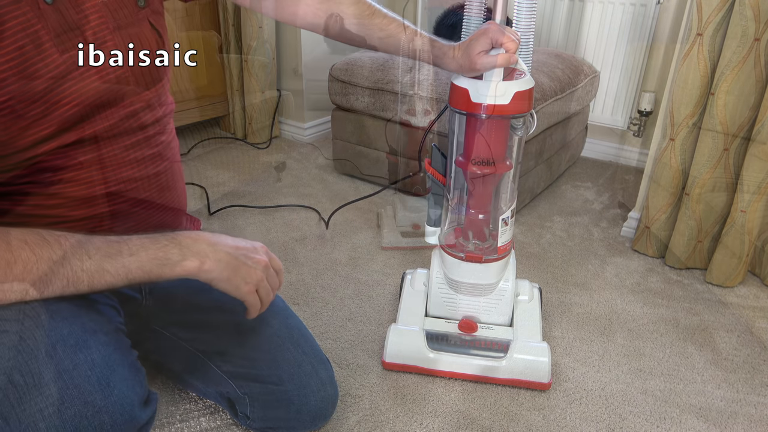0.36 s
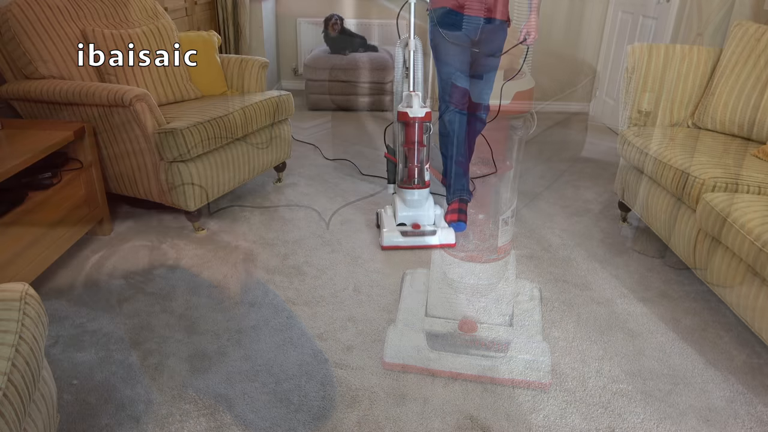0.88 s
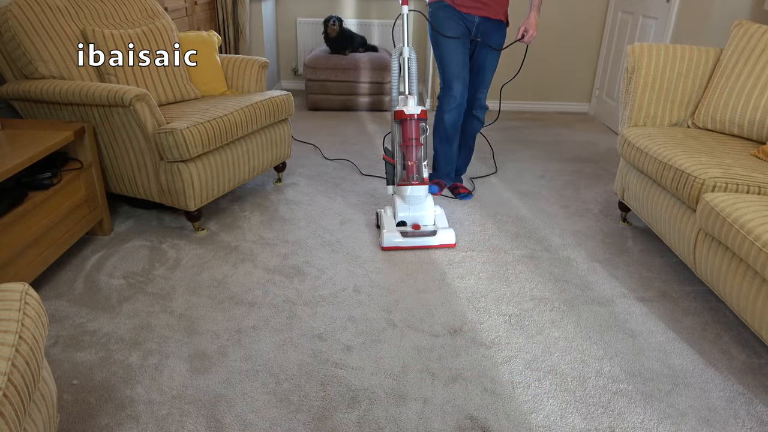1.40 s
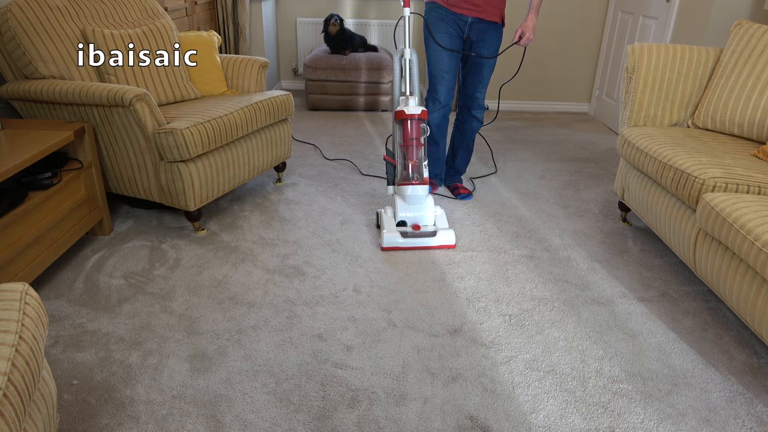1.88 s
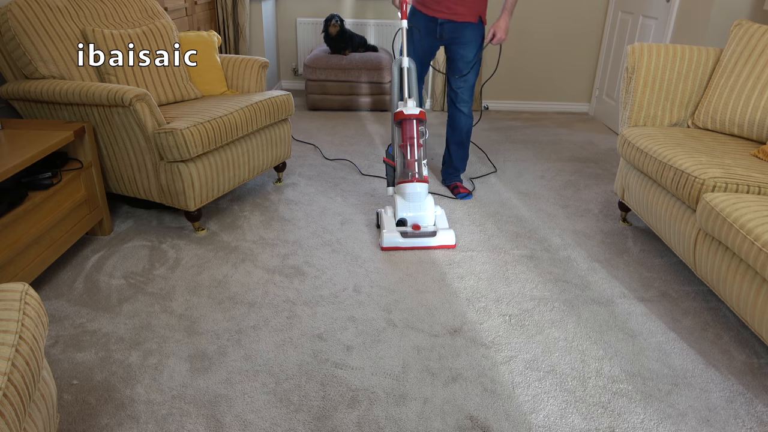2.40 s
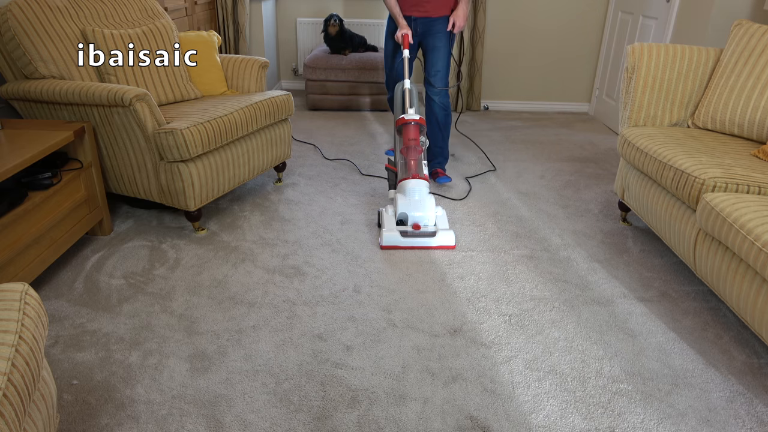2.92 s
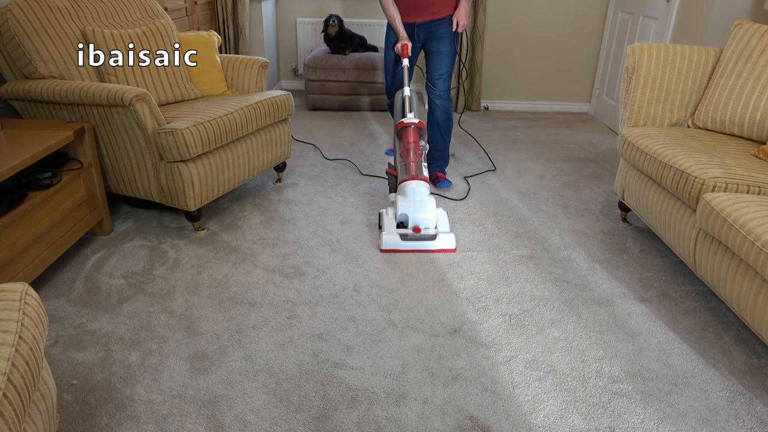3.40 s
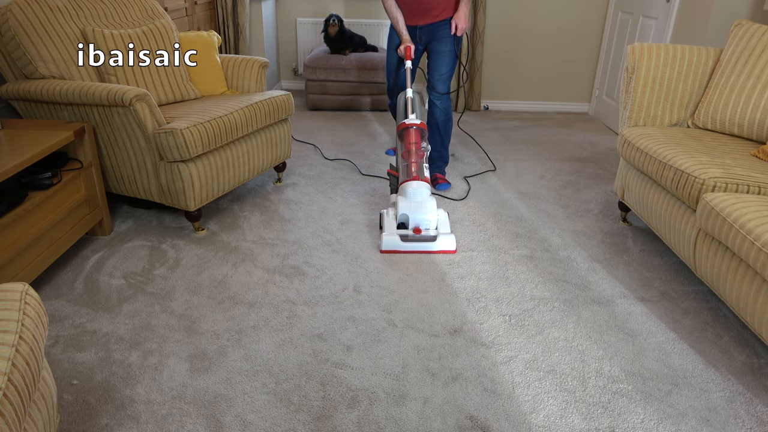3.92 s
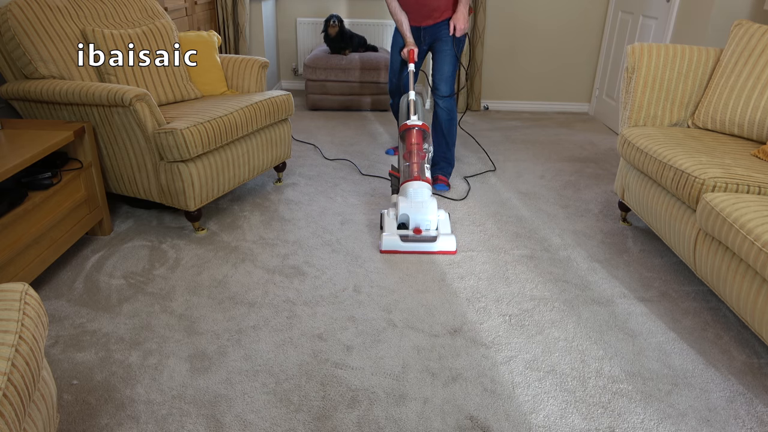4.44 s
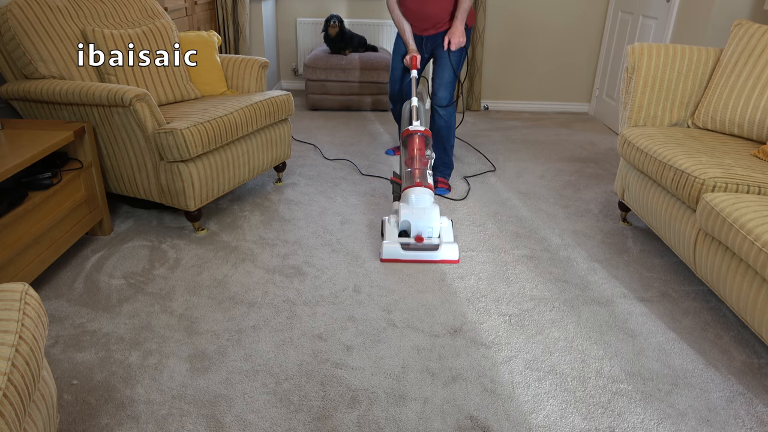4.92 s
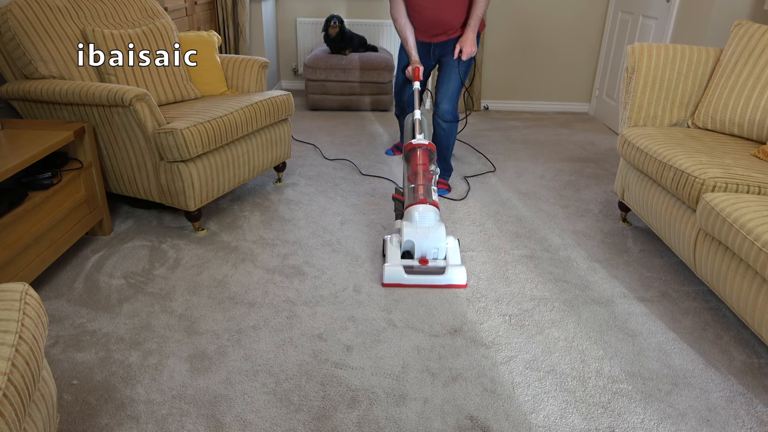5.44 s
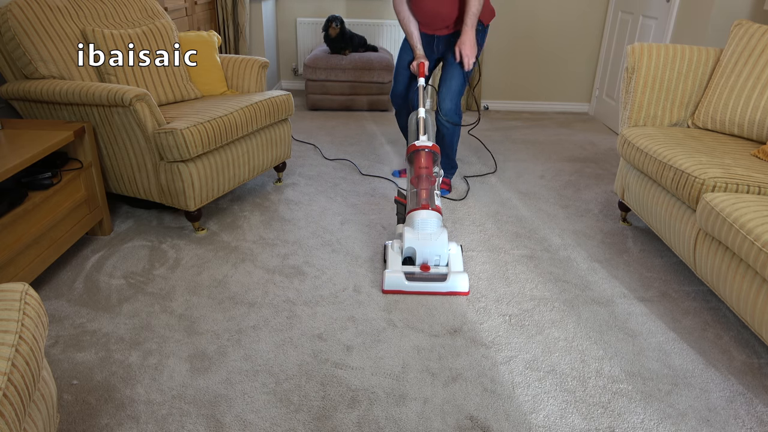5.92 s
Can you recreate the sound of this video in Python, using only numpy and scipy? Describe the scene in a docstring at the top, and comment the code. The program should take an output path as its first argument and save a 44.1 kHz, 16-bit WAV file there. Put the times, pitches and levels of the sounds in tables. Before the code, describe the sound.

A quiet living room with low hum and the fading end of a knock. Light plastic ticks lead to a loud, sharp latch clack just before one second, then faint shuffling and a switch click. The vacuum motor jolts on, whines up quickly and settles into a close, loud roar with fast brush drumming and hiss. The brush then bites the carpet, lowering its pitch and rasping more.

```python
"""An upright vacuum cleaner on living-room carpet: its belt-driven brush roll drums a stack of partials once
a turn, and slows as the handle is lowered and the bristles bite. Fan blades whine as a tone that tracks motor
speed, air roars and hisses as filtered noise, the motor buzzes. Before that come handling ticks (noise bursts),
a plastic latch and a foot switch (uneven noise slips). Mains hum, rumble and room hush lie below."""
import sys
import numpy as np
from scipy import signal
from scipy.fft import rfft, irfft
from scipy.io import wavfile
from scipy.ndimage import uniform_filter1d

SR = 44100
rng = np.random.default_rng(int(sys.argv[2]) if len(sys.argv) > 2 else 0)


def pcm_store(signal):
    """Save signal as 16-bit PCM."""
    levels = np.round(np.clip(np.atleast_2d(signal), -1, 1) * 32767)
    wavfile.write(sys.argv[1], SR, levels.astype(np.int16).T)


def invert_db(x):
    """Field ratio 10**(x/20) for x, a level in decibels (scalar or array-like)."""
    u = np.asarray(x, float) / 20
    return 10 ** u


N = 267510
SWITCH_S = 1.622

# stance of the machine: t/s, stance index (0 running up, 1 parked upright, 2 tipped back,
# 3 pressed into the pile, 4 starting to roll, 5 pushed along, 6 slowed)
STANCE_TRACK = [(2.0, 0), (2.35, 1), (3.12, 1), (3.35, 2), (3.7, 3), (4.25, 3), (4.6, 4), (4.8, 4),
                (5.1, 5), (5.5, 5), (5.8, 6)]
# carpet drag: t/s, roll slowdown/(turns/s), blade tone sag/Hz
CARPET_DRAG = [(3.13, 0, 0), (3.22, 1.3, 5), (3.33, 3.8, 24), (3.46, 5.8, 52), (3.7, 7.1, 93),
               (3.9, 7.6, 106), (4.24, 7.4, 112), (4.41, 6.1, 104), (4.52, 4.1, 94), (4.6, 3.7, 87),
               (4.67, 3.9, 80), (4.81, 5.3, 75), (4.99, 3.0, 67), (5.19, 1.7, 52), (5.48, 1.3, 38),
               (5.7, 2.9, 43), (5.85, 2.5, 50), (6.07, 1.6, 38)]
# working effort: t/s, machine level/dB, bristle bite/dB
EFFORT_TRACK = [(1.62, -8, -17), (1.75, -2.2, -5), (2.1, 0.4, -5), (2.5, -0.05, -18), (2.7, -0.3, -10),
                (3.15, -0.5, -3.5), (3.28, 0.1, -4), (3.47, -1.7, 5.5), (3.5, -0.5, 5), (3.8, -4, 12),
                (4.28, -6, 9), (4.36, -3, 5), (4.42, -4, -0.5), (4.63, -3, 0.5), (4.67, -2.5, 4.5),
                (5.26, -2.5, 1.5), (5.6, -4, 2), (6.07, -9.5, 8.5)]
# resonances of the plastic shell: f/Hz, relative density/dB
SHELL_COLOUR = [(35, -53), (60, -20), (169, -1), (319, -11), (659, -3.5), (735, -2), (881, -7), (1000, -4),
                (1140, -14), (1240, -5), (1470, -13.5), (1890, -6.5), (3260, -23), (3840, -10.5),
                (4600, -29), (5980, -51), (10100, -120)]


def curve(rows, before=-120.):
    """Table columns interpolated along time; `before` holds ahead of the first row."""
    s, *cols = np.transpose(rows)
    return [np.interp(np.arange(N) / SR, s, c, left=before) for c in cols]


def colour(x, points, lo_hz=20., hi_hz=20000.):
    """Filter by (f/Hz, level/dB) points on a log frequency axis; rms 1 between lo_hz and hi_hz."""
    hz, db = np.transpose(points)
    f = np.fft.rfftfreq(N, 1 / SR) + 1e-3
    spec = rfft(x) * invert_db(np.interp(np.log(f), np.log(hz), db))
    part = irfft(spec * ((f > lo_hz) & (f < hi_hz)), N)
    return irfft(spec, N) / np.std(part)


def walk(rate_hz):
    """Random levels held 1 / rate_hz and slewed twice; spread near 1."""
    k = int(SR / rate_hz)
    steps = np.repeat(rng.standard_normal(N // k + 1), k)
    return 1.28 * uniform_filter1d(uniform_filter1d(steps, k), k)[:N]


def ring(modes, secs, spread_hz=70.0, count=5):
    """Decaying modes, each a cluster of close partials that beat; low ones cluster tighter."""
    t = np.arange(int(secs * SR)) / SR
    out = np.zeros(len(t))
    for hz, db, t60_s in modes:
        for _ in range(count):
            near_hz = hz + min(spread_hz, hz / 20) * rng.standard_normal()
            phase = rng.standard_normal()
            out += invert_db(db - 60 * t / t60_s) * np.cos(2 * np.pi * near_hz * t + phase)
    return out


def hush():
    """Steady room hush: coloured noise."""
    # f/Hz, relative density/dB
    hush_colour = [(41, -46), (70, -23), (108, 2.5), (123, -20), (154, -9), (177, -11.5), (305, -12.5),
                   (418, -18), (490, -22), (524, -24.5), (2920, -40), (5150, -40.5), (15600, -36)]
    return colour(rng.standard_normal(N), hush_colour, 200, 20000) * invert_db(-53.5)


def hum():
    """Mains hum: a fundamental that wavers along with a low rumble, plus steady overtones."""
    # t/s, common level of fundamental and rumble/dB
    hum_track = [(0.0, -38), (0.24, -41), (0.466, -34.5), (0.934, -29), (1.122, -31), (1.18, -37),
                 (1.318, -33), (1.38, -35.5), (1.6, -33), (1.8, -32), (2.6, -38), (6.07, -48)]
    # f/Hz, level/dB; the first row is the fundamental, whose level comes from hum_track instead
    mains = [(48.4, -39), (96.9, -63), (150.7, -50.5), (253.0, -66), (306.8, -65)]
    t = np.arange(N) / SR
    level_db = curve(hum_track, hum_track[0][1])[0] + 2.5 * walk(9.76)
    low, *upper = (np.sqrt(2) * np.sin(2 * np.pi * (hz * t + rng.random())) for hz, _ in mains)
    overtones = sum(invert_db(db) * tone for (_, db), tone in zip(mains[1:], upper))
    rumble_colour = [(12, -37), (25, -8), (42, -17), (60, -9), (100, -33), (300, -83)]
    rumble = colour(rng.standard_normal(N), rumble_colour)
    return invert_db(level_db) * (0.82 * low + 0.44 * rumble) + overtones


def earlier_knock():
    """End of a knock just before the start: ringing modes over a decaying noise tail."""
    # f/Hz (cluster centre), level/dB of each partial, t60/s
    knock_modes = [(74.7, -35.5, 0.32), (292, -60, .2), (1545, -44.5, 0.36), (1810, -45, 0.2),
                   (2900, -56, 0.24), (3700, -48, 0.28), (4670, -59, 0.19)]
    t = np.arange(N) / SR
    tail = invert_db(-41.0 - 60 * t / 0.42) * colour(rng.standard_normal(N), SHELL_COLOUR)
    return tail + np.pad(ring(knock_modes, .5), (0, N))[:N]


def room(x):
    """Carpet and cushions: a short tail, the treble dying first."""
    t60_s, tail_db = .38, -9
    t = np.arange(int(.6 * SR)) / SR
    noise = rng.standard_normal(len(t)) * (t > .004)
    low = signal.lfilter([.25], [1, -.75], noise)
    high = noise - low
    tail = low * invert_db(-60 * t / t60_s) + .6 * high * invert_db(-60 * t / (.85 * t60_s))
    return x + invert_db(tail_db) * signal.fftconvolve(x, tail / np.linalg.norm(tail))[:N]


def ticks():
    """Contacts on the plastic: each a short band-passed noise knock with a bright edge."""
    # t/s, relative level/dB, centre f/Hz, t60/s, bright edge against knock/dB
    contacts = [(.557, -43, 2000, .03, -20), (.604, -45, 2000, .03, -22), (.717, -26, 606, 0.039, -23),
                (.767, -27.5, 493, 0.053, -16), (.778, -31, 2200, 0.027, -6), (0.83, -23, 2120, 0.017, -5),
                (.953, -16, 3800, .01, 7), (0.96, 3, 1530, 0.018, -2.5), (1.317, -44, 5000, .01, -6),
                (1.401, -33, 1560, 0.12, -22), (1.417, -42, 3700, .03, -8), (1.549, -27.5, 690, .07, -15),
                (1.581, -25, 1020, 0.031, -25), (1.623, -20, 700, .03, -3), (1.645, -24, 3000, .03, 3)]
    out, t = np.zeros(N), np.arange(int(.15 * SR)) / SR
    bright = signal.butter(1, [3000., 9000.], "bandpass", fs=SR, output="sos")
    for s, db, hz, t60_s, edge_db in contacts:
        band = signal.butter(2, [hz / 1.25, hz * 1.22], "bandpass", fs=SR, output="sos")
        noise = rng.standard_normal(len(t))
        attack = 1 - np.exp(-t / 0.0005)
        knock = signal.sosfilt(band, noise * attack * invert_db(-60 * t / t60_s))
        edge = signal.sosfilt(bright, noise * invert_db(-60 * t / .005))
        both = knock / np.abs(knock).max() + invert_db(edge_db) * edge / np.abs(edge).max()
        i = int(s * SR)
        out[i:i + len(t)] += invert_db(db - 2.0) * both
    return out


def slide(rows, scatter_db=2.0):
    """Dense uneven slips of plastic on plastic: the shell's resonances and a bright scrape."""
    slips = rng.standard_normal((2, N)) * invert_db(scatter_db * walk(400))
    shell_db, scrape_db = curve(rows)
    shell = colour(slips[0], SHELL_COLOUR, 500, 4600)
    scrape = colour(slips[1], [(3000, -34), (4600, 2.0), (8000, 1), (11000, -6), (15700, -25)])
    sliding = np.arange(N) < rows[-1][0] * SR
    return (shell * invert_db(shell_db) + scrape * invert_db(scrape_db)) * sliding


def latch():
    """The handle latch slides, lets go and rattles."""
    # t/s, shell level/dB, scrape level/dB
    latch_track = [(.45, -72, -80), (.56, -57, -76), (.71, -53.5, -72), (.83, -41, -56), (.9, -45, -58),
                   (.947, -32.5, -43), (.959, -12, -20), (.969, -22, -41), (1.015, -17.5, -37.5),
                   (1.07, -34.5, -48)]
    return slide(latch_track)


def foot_switch():
    """A foot shuffles onto the switch and presses it down."""
    # t/s, shell level/dB, scrape level/dB
    press_track = [(1.12, -62, -62), (1.3, -57, -60.5), (1.575, -58, -64), (1.585, -41, -63),
                   (1.622, -47, -57)]
    return slide(press_track)


def speed(lead_s=.035):
    """Share of full speed: a quick and a slow exponential run-up, starting lead_s before the switch."""
    quick_share, quick_s, slow_s = .49, .085, .256
    on_s = np.maximum(np.arange(N) / SR - SWITCH_S + lead_s, 0)
    return 1 - quick_share * np.exp(-on_s / quick_s) - (1 - quick_share) * np.exp(-on_s / slow_s)


def roll_angle():
    """Brush roll angle/rad: integrated turn rate, slowed by carpet drag."""
    free_turns_per_s = 71.45
    return 2 * np.pi * np.cumsum(free_turns_per_s * speed() - curve(CARPET_DRAG, 0)[0]) / SR


def stance_db(column):
    """One column of the stance balance along time, offset by the machine's level."""
    # one row a stance: low drumming/dB, bristle slap/dB, top hiss/dB
    balance = [(-20, -27, -35), (-21.5, -26, -34), (-20, -20.5, -37), (-20.5, -19, -34.5),
               (-19.5, -19, -37), (-19.5, -22.5, -38), (-18, -21.5, -35.5)]
    levels = np.transpose(balance)[column]
    return np.interp(curve(STANCE_TRACK, 0)[0], np.arange(len(balance)), levels) + curve(EFFORT_TRACK)[0]


def jolt():
    """Loose panels and wheels shake in lumps of noise as the motor kicks in, then die away."""
    # f/Hz, relative density/dB
    jolt_colour = [(29, -43), (50, -12), (92, -14), (172, -10), (205, -10.5), (361, -5), (912, -20),
                   (1180, -27), (1500, -24), (1950, -51), (3300, -120)]
    level_db, rise_s, hold_s, fall_db_per_s = -16, 0.034, 0.21, 130
    on_s = np.arange(N) / SR - SWITCH_S
    lumps = rng.standard_normal(N) * invert_db(2.8 * walk(150))
    fall_db = fall_db_per_s * np.maximum(on_s - hold_s, 0)
    return colour(lumps, jolt_colour, 120, 1000) * invert_db(level_db - fall_db) * np.clip(on_s / rise_s, 0, 1)


def buzz():
    """The magnetic pull peaks twice a mains cycle, strongest at the inrush and under load."""
    base_db, inrush_db, inrush_s, db_per_slip, waver_db = -31, 17.5, 0.23, .5, 1.5
    t = np.arange(N) / SR
    surge_db = inrush_db * np.exp(-np.maximum(t - SWITCH_S, 0) / inrush_s)
    load_db = db_per_slip * curve(CARPET_DRAG, 0)[0]
    level_db = base_db + surge_db + load_db + waver_db * walk(3.99)
    return np.sqrt(2) * invert_db(level_db) * np.sin(2 * np.pi * 99.9 * t)


def air(turn):
    """Turbulent roar and hiss as noise; two bristle rows rasp over the pile twice a turn."""
    # each: f/Hz, relative density/dB
    roar_colour = [(18, -34), (30, -14), (80, -9.5), (193, -12), (257, -7), (304, -16.5), (445, -2.5),
                   (565, -14.5), (684, -4.5), (1160, -16.5), (2200, -13.5), (3070, -19), (3550, -14.5),
                   (5200, -31.5), (9000, -31.5), (11700, -51), (19800, -120)]
    hiss_colour = [(2650, -17), (4500, -1), (5340, -4), (6820, -4.5), (7530, -2.5), (9420, -6.5),
                   (12300, -5.5), (14300, -10.5), (15600, -14.5)]
    rasp_colour = [(3530, -5), (6000, -5), (6920, -8.5), (7500, 1), (9080, 3), (10800, 2.5), (11500, -4.5),
                   (13000, -13)]
    roar_db, rasp_db, hiss_db_per_bite_db, hiss_db_per_decade = -23, -29, 0.15, 31
    level_db, bite_db = curve(EFFORT_TRACK)

    roar_noise = rng.standard_normal(N) * (1 + 0.033 * np.cos(turn))
    roar = colour(roar_noise, roar_colour, 880, 4950) * invert_db(level_db + roar_db + 2.16 * walk(12))

    speed_db = hiss_db_per_decade * np.log10(np.maximum(speed(), .4))
    hiss_db = stance_db(2) + hiss_db_per_bite_db * bite_db + speed_db
    hiss = colour(rng.standard_normal(N), hiss_colour, 11660, 15800) * invert_db(hiss_db + 0.67 * walk(15))

    gate = (1 + 0.34 * np.cos(turn)) * invert_db(6.2 * np.cos(2 * turn))
    rasp = colour(rng.standard_normal(N) * gate, rasp_colour) * invert_db(level_db + bite_db + rasp_db)
    return roar + hiss + rasp


def fan():
    """Blade tone with faint sidebands one shaft turn away; it swells and fades in the room's standing waves."""
    # multiple of the shaft rate, level against the whine/dB
    shaft_partials = [(11, -17), (12, 0), (13, -19)]
    # swells of the whine: start t/s, length/s, level/dB
    swells = [(1.753, 0.018, -21), (1.903, .04, -30.5), (2.043, 0.14, -24), (2.243, 0.062, -22.5),
              (2.44, .02, -25), (2.54, 0.23, -25.5), (2.99, .23, -28), (3.35, 0.055, -23.5),
              (3.53, 0.061, -27), (3.64, .04, -30), (3.772, 0.62, -23), (4.55, 0.017, -28),
              (4.655, 0.2, -25), (4.95, 0.08, -27), (5.22, .055, -29.5), (5.35, .04, -33),
              (5.497, .12, -31.5)]
    blades, free_blade_hz = 12, 4060
    floor_db, fade_db_per_s = -40, 200
    ripple_hz, ripple_step_hz, ripple_db, ripple_until_share = 3680, 48.2, 4, .03

    t, share = np.arange(N) / SR, speed(lead_s=0.)
    hz = free_blade_hz * share - curve(CARPET_DRAG, 0)[1]
    shaft = 2 * np.pi * np.cumsum(hz * (1 + 0.00027 * walk(40.0))) / SR / blades

    level_db = np.full(N, float(floor_db))
    for s, secs, db in swells:
        outside_s = np.maximum(np.abs(t - s - secs / 2) - secs / 2, 0)
        level_db = np.maximum(level_db, db - fade_db_per_s * outside_s)

    # standing waves crossed during run-up; the ripple ends ripple_until_share below full speed
    depth = np.clip((1 - share) / ripple_until_share - 1, 0, 1)
    ripple = depth * np.cos(2 * np.pi * (hz - ripple_hz) / ripple_step_hz)
    waver_db = 1.2 * walk(14)
    tone = sum(invert_db(db) * np.sin(n * shaft) for n, db in shaft_partials)
    return np.sqrt(2) * invert_db(level_db + ripple_db * ripple + waver_db) * tone


def brush_roll(turn, count=62):
    """The same bumps come round every turn; high partials line up into one sharp slap of the bristles."""
    # each: multiple of the turn rate, relative level/dB
    run_up = [(1, 1), (2, -12), (3, -2), (4, 6.5), (5, -2.5), (6, -7), (7, 1.5), (8, -6), (9, -10),
              (10, -2), (11, -47), (12, -8), (13, -27), (14, -3.5)]
    parked = [(1, 4.5), (2, -3.5), (3, -7.5), (4, -11), (5, 1.5), (6, 1.5), (7, 3), (8, -3.5), (9, -0.5),
              (10, -7), (11, -3.5), (12, -13), (13, -41), (14, -1.5), (15, -5.5), (16, -12), (17, -32),
              (18, -9.5), (19, -8), (20, -17), (21, -27), (22, -38), (23, -66), (24, -15), (25, -31),
              (26, -30), (27, -20), (28, -20), (29, -38), (30, -19), (31, -15), (32, -15), (33, -5.5),
              (34, -32), (35, -18), (36, -6.5)]
    tipped = [(1, 0), (2, -5.5), (3, -12), (4, 3), (5, -1), (6, -4), (7, -8), (8, -34), (9, -3.5), (10, -1),
              (11, -9), (12, -2), (13, -16), (14, -15), (15, -5), (16, -9), (17, -9), (18, -19), (19, -10),
              (20, -14), (21, -21), (22, -4), (23, -24), (24, -27), (25, -3.5), (26, -26), (27, -19),
              (28, -13), (29, -18), (30, -4), (31, -16), (32, -6), (33, -3), (34, -7), (35, -24),
              (36, -4.5), (37, -27), (38, -20), (39, -28), (40, -25)]
    pressed = [(1, 3), (2, -10), (3, -3.5), (4, -1), (5, -7.5), (6, -3.5), (7, -0.5), (8, -5), (9, -13),
               (10, -4.5), (11, -2.5), (12, -12), (13, -8.5), (14, -23), (15, -3.5), (16, -30), (17, -4.5),
               (18, -28), (19, -27), (20, -9), (21, -8), (22, -30), (23, -50), (24, -32), (25, -11),
               (26, -3), (27, -14), (28, -24), (29, -26), (30, -3.5), (31, -17), (32, -27.5), (33, -24),
               (34, -7), (35, -29), (36, -5.5), (37, -30), (38, -26), (39, -7.5), (40, -24), (41, -8),
               (42, -25), (43, -29), (44, -7.5), (45, -54), (46, -28), (47, -14), (48, -38), (49, -25),
               (50, -27), (51, -27), (52, -11), (53, -23), (54, -14), (55, -15), (56, -13)]
    rolling = [(1, -4), (2, -17), (3, -11.5), (4, -3.5), (5, -4), (6, 2), (7, -7.5), (8, -2), (9, -11),
               (10, -5), (11, -12), (12, -8), (13, -2.5), (14, -21), (15, -5), (16, -27), (17, -12),
               (18, -32), (19, -10), (20, -8), (21, -24), (22, -19), (23, -13), (24, -13), (25, -18),
               (26, -26), (27, -8.5), (28, -12), (29, -18), (30, -19), (31, -8), (32, -18), (33, -9),
               (34, -23), (35, -32), (36, -10), (37, -26), (38, -13), (39, -20), (40, -8), (41, -21),
               (42, -24), (43, -26), (44, -11.5), (45, -26), (46, -29)]
    pushed = [(1, 1.5), (2, -8.5), (3, -25), (4, -6.5), (5, -0.5), (6, 0.5), (7, 1), (8, -3.5), (9, -8.5),
              (10, -1), (11, -18), (12, -0.5), (13, -12), (14, -29), (15, -19), (16, -26), (17, -6),
              (18, -20), (19, -12), (20, -6.5), (21, -13), (22, -13), (23, -19), (24, -6.5), (25, -30),
              (26, -21), (27, -8.5), (28, -18), (29, -10), (30, -5), (31, -11), (32, -8), (33, -5),
              (34, -24), (35, -29), (36, -29), (37, -30), (38, -4.5), (39, -23), (40, -24), (41, -4.5),
              (42, -22), (43, -27), (44, -8), (45, -27), (46, -31), (47, -27), (48, -9), (49, -32),
              (50, -5), (51, -11), (52, -21), (53, -37), (54, -17), (55, -14), (56, -18)]
    slowed = [(1, 1), (2, -6), (3, -14), (4, -4), (5, -3.5), (6, 4.5), (7, 1.5), (8, -6), (9, -1), (10, -8),
              (11, -25), (12, -3.5), (13, -19), (14, -27), (15, 1.5), (16, -29), (17, -4.5), (18, -30),
              (19, -9), (20, 2), (21, -20), (22, -28), (23, -20), (24, -4), (25, -23), (26, -7), (27, -39),
              (28, -29), (29, -26), (30, -2), (31, -24), (32, -21), (33, -1), (34, -19), (35, -12),
              (36, -15), (37, -24), (38, -8), (39, -21), (40, -3), (41, -11), (42, -19), (43, -26),
              (44, -7), (45, -23), (46, -25), (47, -27), (48, -6), (49, -28), (50, -4.5), (51, -31),
              (52, -22), (53, -30), (54, -28), (55, -31), (56, -30)]
    even_from_s, even_over_s = 1.687, .14  # drumming emerges from the shudder
    hop, knots, low_count = 64, 45, 12
    drift_rad, smear_rad = .4, .8

    k = np.arange(1, count + 1)
    stances = []
    for table in (run_up, parked, tipped, pressed, rolling, pushed, slowed):
        listed_db = np.interp(k, *np.transpose(table))
        # beyond the table: mean of its last 8 levels, sloping down
        beyond_db = np.mean(table[-8:], axis=0)[1] - 0.082 * (k - len(table))
        stances.append(np.where(k <= len(table), listed_db, beyond_db))
    stances = np.array(stances)
    # a short slap cannot single out one partial: neighbours share their power
    power = 10 ** (stances[:, low_count:] / 10)
    stances[:, low_count:] = 10 * np.log10(signal.convolve(power, [[.15, .7, .15]], "same"))

    where = curve(STANCE_TRACK, 0)[0][::hop]
    at_knot = np.linspace(0, knots - 1, len(where))
    # short waves shift more as the machine moves, neighbours together
    chance = rng.standard_normal((2, count, knots))
    wander_spread_db = np.interp(k, [6, 30], [1.5, 2.3])[:, None]
    chance[0] = 1.6 * uniform_filter1d(chance[0], size=3, axis=0) * wander_spread_db
    # the bristles never land at quite the same angle, which blurs the high partials
    angle = turn + .014 * walk(45)

    drum, slap = np.zeros((2, N))
    for n in k:
        db = np.interp(where, np.arange(len(stances)), stances[:, n - 1])
        wander_db, slip = (np.interp(at_knot, np.arange(knots), c) for c in chance[:, n - 1])
        phase = rng.standard_normal() * (smear_rad if n > low_count else np.pi)
        gain = invert_db(db + wander_db) * np.exp(1j * (drift_rad * slip + phase))
        partial = np.real(np.repeat(gain, hop)[:N] * np.exp(1j * n * angle))
        if n > low_count:
            slap += partial
        else:
            drum += partial
    even = np.clip((np.arange(N) / SR - even_from_s) / even_over_s, 0, 1)
    return even * (invert_db(stance_db(0)) * drum + invert_db(stance_db(1)) * slap)


def scene():
    """Machine from the switch on, handling noises in the room, background."""
    turn = roll_angle()
    running = np.arange(N) > SWITCH_S * SR
    machine = (brush_roll(turn) + fan() + air(turn) + buzz() + jolt()) * running
    handling = room(ticks() + latch() + foot_switch())
    background = hum() + hush() + earlier_knock()
    return (machine + handling + background)[None]


def top_cut(x):
    """Nothing passes above the cut-off."""
    return signal.sosfilt(signal.butter(12, 15740, fs=SR, output="sos"), x)


def record(dry):
    """Soft clipping rounds the loudest peaks; a steep low-pass cuts the top."""
    rounded = np.tanh(0.72 * dry) / 0.69
    low_pass = signal.ellip(8, .2, 70, 15750, fs=SR, output="sos")
    return top_cut(signal.sosfilt(low_pass, rounded))


dry = scene()
out = record(dry)
pcm_store(out)
```